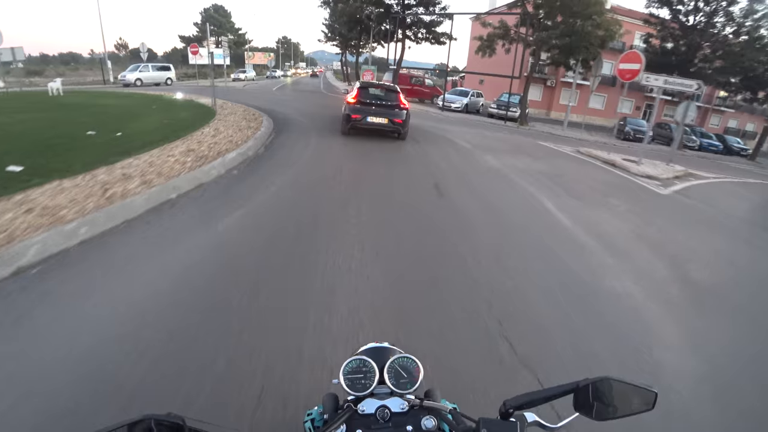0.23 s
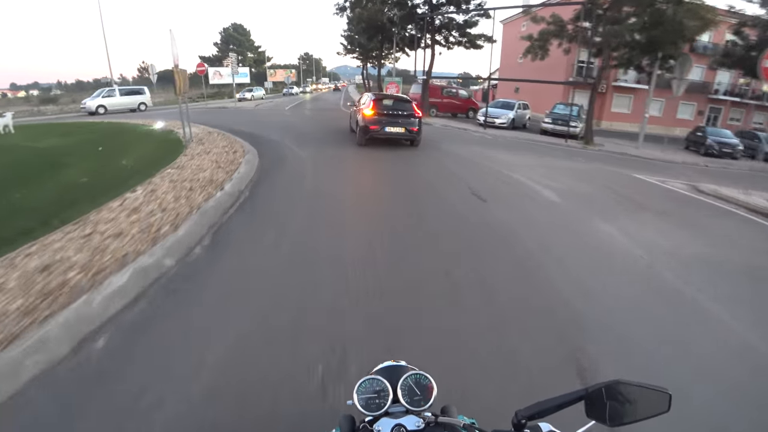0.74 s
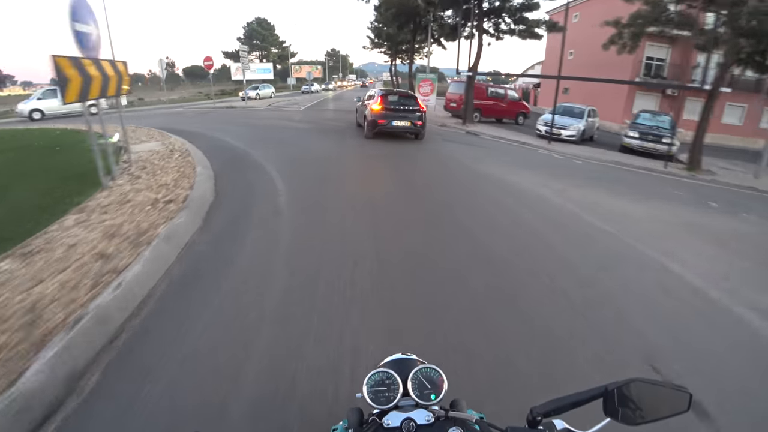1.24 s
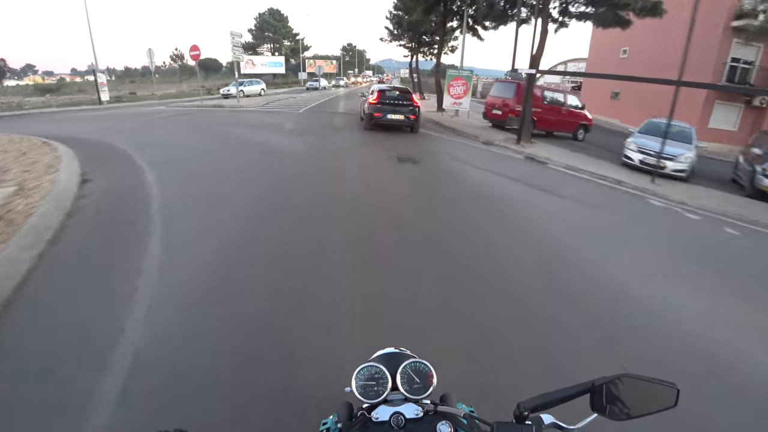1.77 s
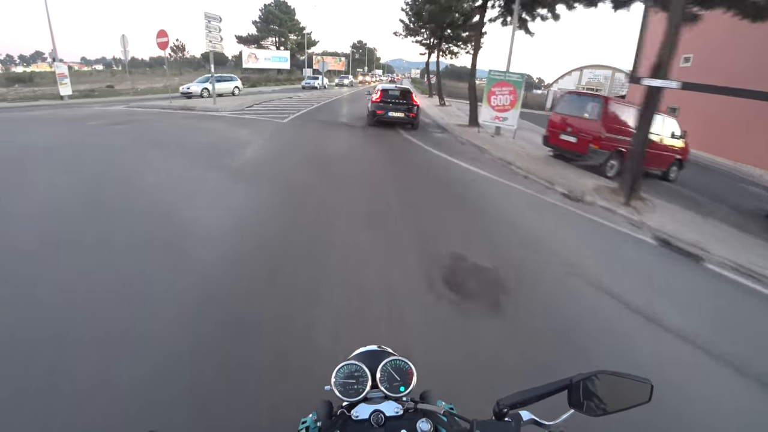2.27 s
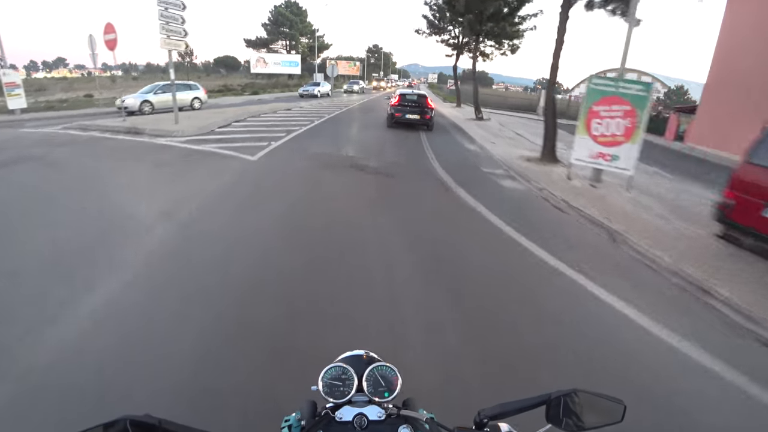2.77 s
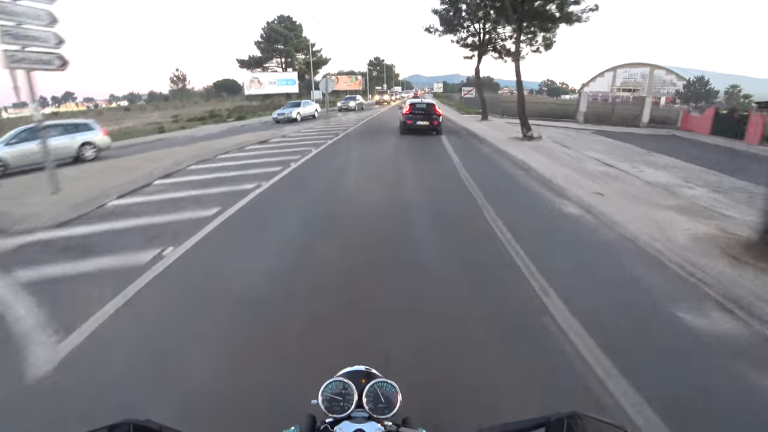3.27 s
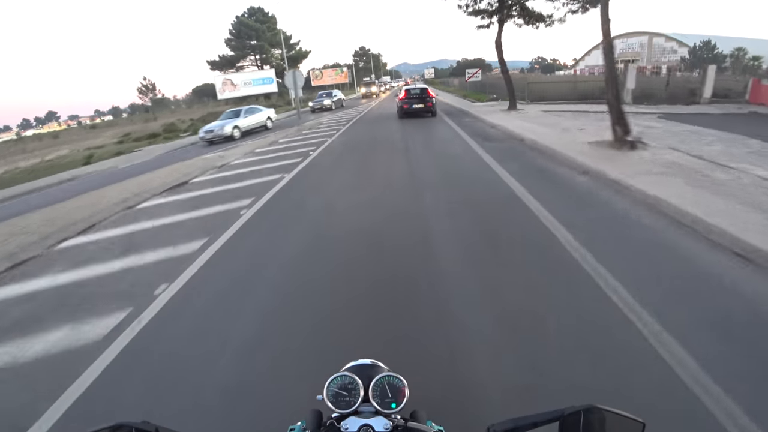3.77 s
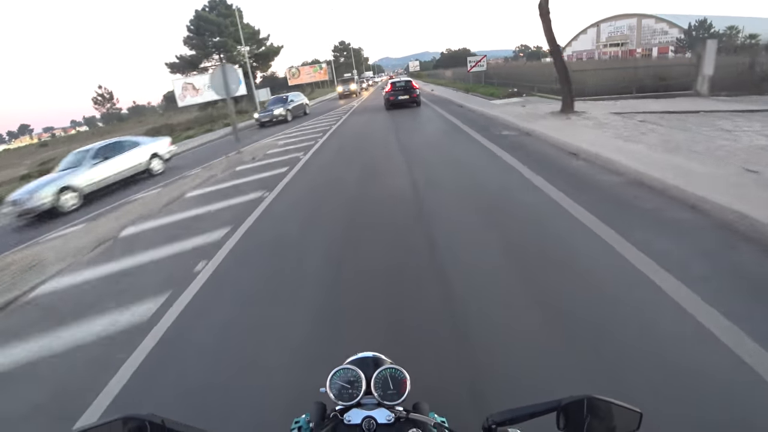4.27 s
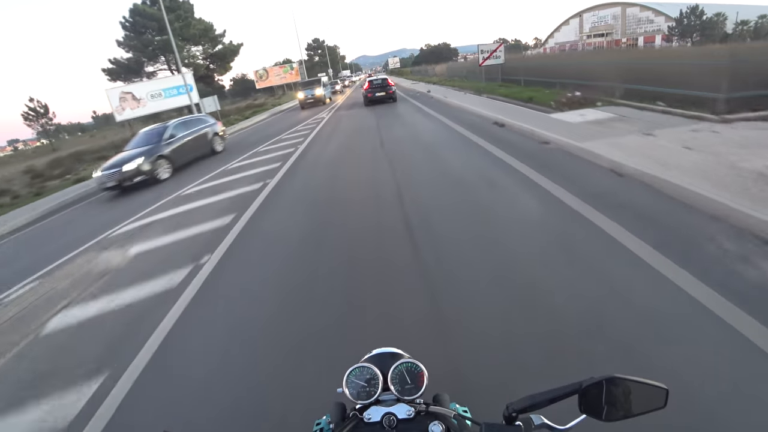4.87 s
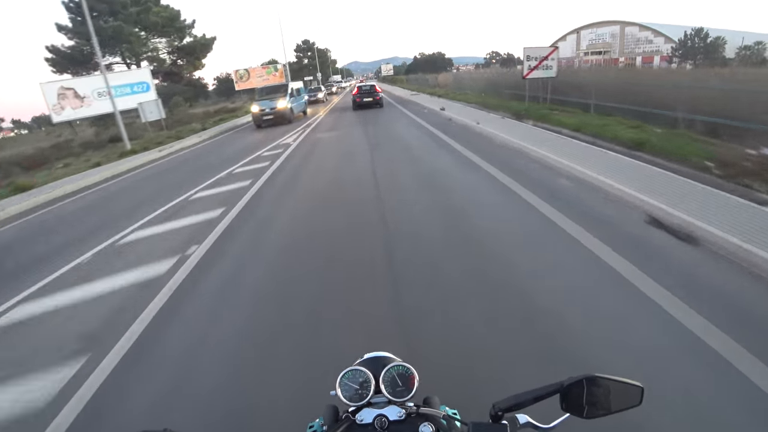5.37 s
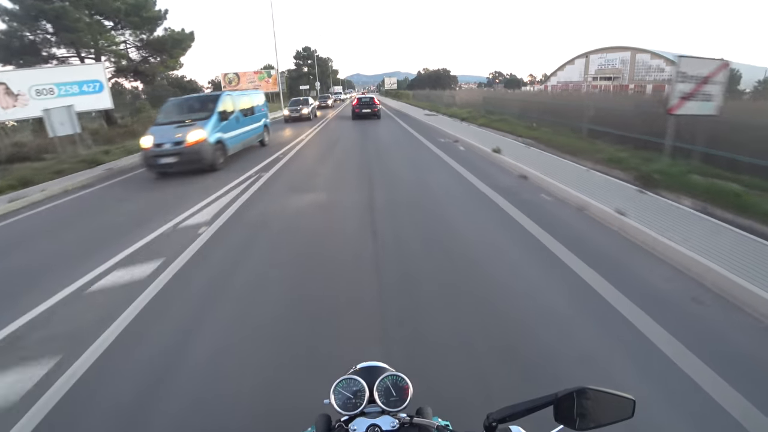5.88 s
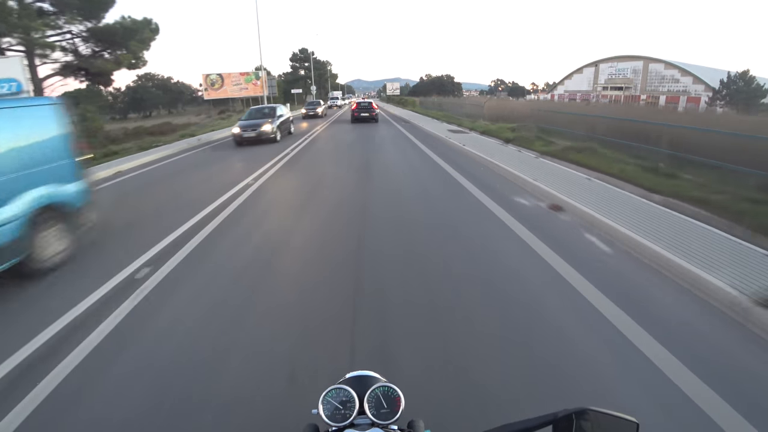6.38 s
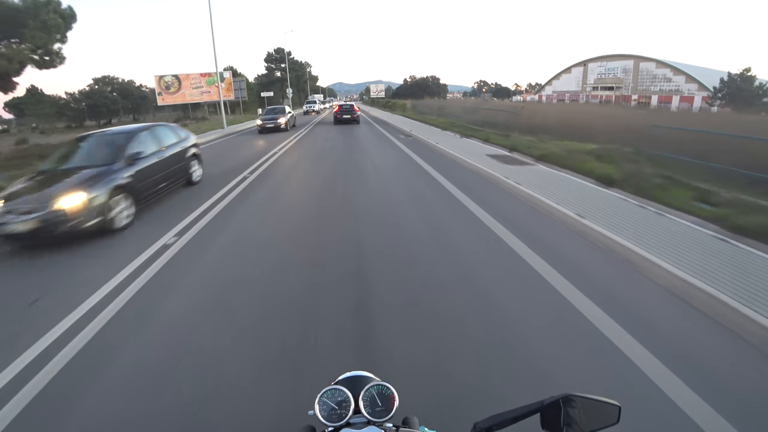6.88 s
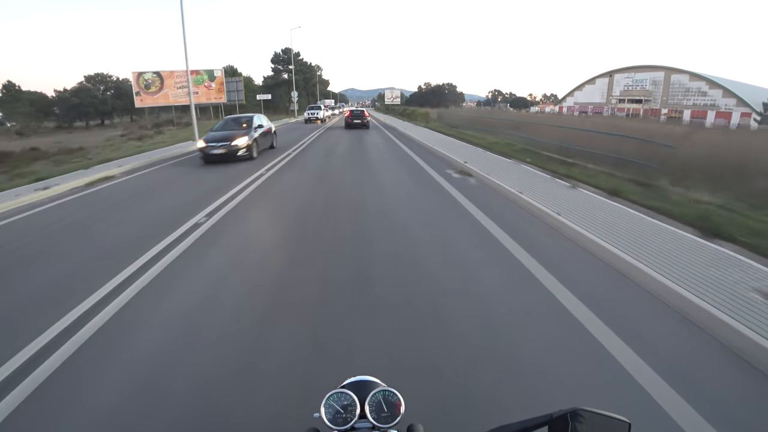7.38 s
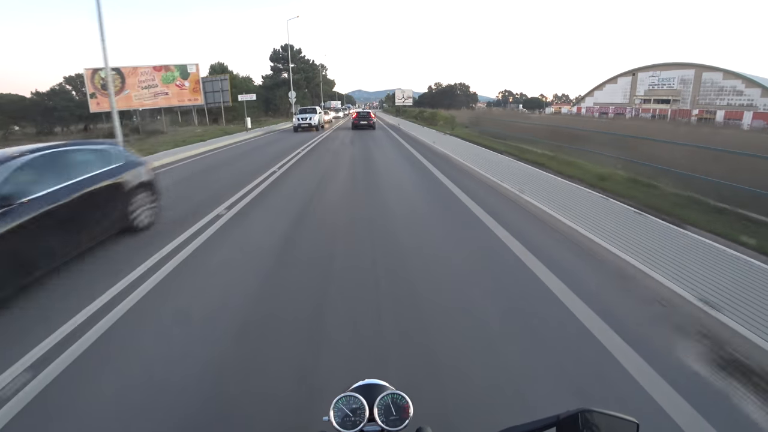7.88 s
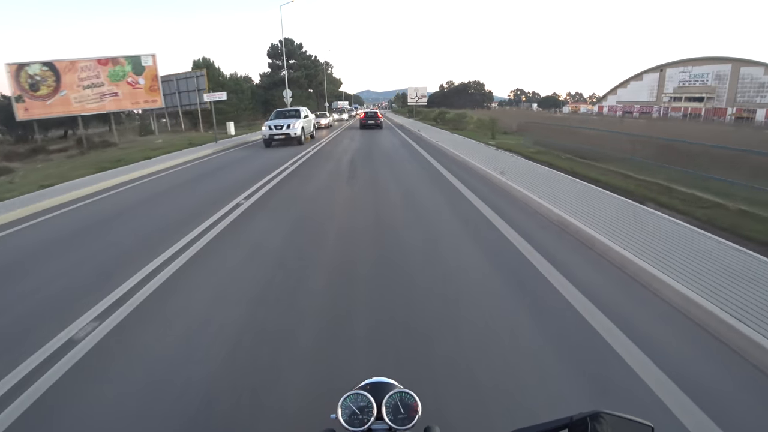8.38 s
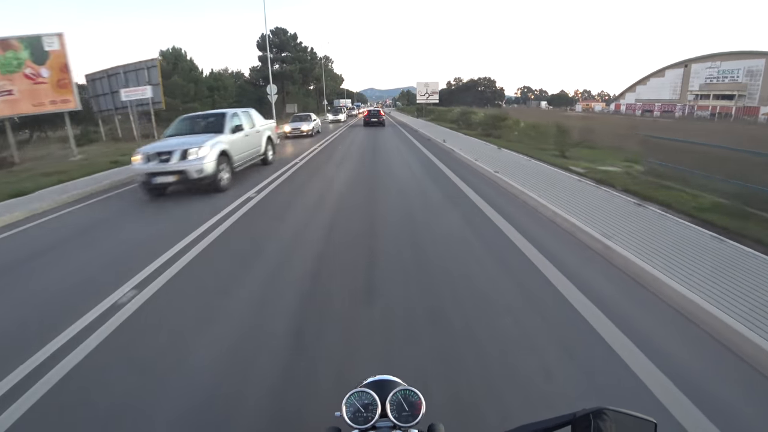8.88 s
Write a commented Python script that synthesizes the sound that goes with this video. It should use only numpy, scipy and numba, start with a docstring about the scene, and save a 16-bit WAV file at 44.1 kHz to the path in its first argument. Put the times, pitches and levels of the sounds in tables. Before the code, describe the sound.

A one-cylinder motorcycle growls up through the gears, its exhaust popping at the shifts, over rushing wind and tyres.

```python
"""On the road, in the rider's seat: a one-cylinder motorcycle leaves a bend and pulls through the gears.
Surges of gas in each engine cycle make the airbox (the air intake) and exhaust ring, a growl that climbs
with the revs. Gas rasps through the throttle, valves tick, chain and gears hiss and the crankshaft hums.
When the throttle shuts for a gear change, unburnt fuel pops in the exhaust and the gearbox clicks.
Wind and tyres rush underneath."""
import sys
import numpy as np
from scipy import signal
from scipy.fft import rfft, irfft, next_fast_len
from scipy.io import wavfile
from scipy.ndimage import uniform_filter1d
from numba import njit

SR = 44100
rng = np.random.default_rng(int(sys.argv[2]) if len(sys.argv) > 2 else 0)


def persist_wave(psi):
    """Save psi, clipped to +-1, as 16-bit WAV."""
    counts = np.round(np.clip(psi, -1, 1) * 32767).astype(np.int16)
    wavfile.write(sys.argv[1], SR, np.atleast_2d(counts).T)


N = 402191
T = np.arange(N) / SR
SIZE = next_fast_len(N + SR // 4, True)
FREQ = np.maximum(np.fft.rfftfreq(SIZE, 1 / SR), 1)
MID_REVS_HZ, MID_KMH = 46, 50  # middling firing rate and road speed: here revs = 1 and pace = 1
RAGGED_BELOW = 0.056  # throttle opening (0-1) below which the firing turns ragged
SIDES = np.array([[.5], [-.5]])  # shares a difference between left and right

# Ringing tones of airbox and exhaust at middling revs:
# pitch_hz, width_hz, level_db, left_over_right_db, left_lead_rad, climb (octaves per doubling of revs)
PIPE_TONES = [(287.94, 20.93, -8.18, -1.44, -0.28, 0.04), (310.24, 38.17, -7.29, -2.02, -0.99, 0.04),
              (344.84, 33.63, -11.99, -6.4, -0.11, 0.19), (438.49, 46.17, -15.83, 4.67, 1.19, -0.09),
              (517.22, 65.31, -17.33, 11.0, -2.18, -0.02), (665.51, 89.69, -15.01, -2.31, 2.62, -0.01),
              (776.92, 28.36, -7.5, 6.7, -1.23, 0.05), (874.47, 42.3, 0.24, 6.99, 2.02, 0.21),
              (915.22, 120.36, -5.33, 7.02, 2.12, 0.37), (1122.59, 31.09, -15.17, 6.27, -6.25, 0.13),
              (1277.68, 61.28, -1.9, 3.35, 3.11, 0.17), (1416.22, 101.43, -18.39, -3.24, 2.25, 0.11),
              (1611.34, 79.26, -9.89, -3.18, 2.16, 0.17), (1807.93, 116.64, -14.14, -3.3, 1.87, 0.1)]
# How far the engine's sound on the left runs ahead of the right: pitch_hz, left_lead_rad
LEFT_LEAD = [(60, 0.3), (200, 1.6), (300, 0.9), (440, 1.6), (560, 3.8), (740, 1.4), (870, 2.8), (1000, 2.3),
             (1400, 3.0), (1850, 2.0), (2200, 2.9), (2700, -0.2), (4000, 2.2), (5600, 1.6), (8000, 0.3),
             (11000, -0.4)]


def undb(db):
    """Turn decibels into a gain."""
    return 10 ** (np.asarray(db) / 20)


def unit(x):
    """Scale to an average (rms) level of 1."""
    return x / np.sqrt(np.mean(x ** 2))


def curve(points):
    """Join (time_s, value) points into a value for every sample."""
    return np.interp(T, *np.transpose(points))


def across(points):
    """Join (pitch_hz, value) points into a value for every frequency."""
    hz, value = np.transpose(points)
    return np.interp(np.log(FREQ), np.log(hz), value)


def shape(x, response):
    """Filter a sound with a gain for every frequency."""
    return irfft(rfft(x, SIZE) * response, SIZE)[..., :N]


def causal(gain):
    """A filter with this gain that rings only after it is struck."""
    cepstrum = irfft(np.log(gain), SIZE)
    cepstrum[1:SIZE // 2] *= 2
    cepstrum[SIZE // 2 + 1:] = 0
    return np.exp(rfft(cepstrum))


def walk(rate_hz):
    """A smooth random wander, roughly between -1 and 1."""
    knots = rng.standard_normal(2048)
    return uniform_filter1d(np.interp(T * rate_hz, np.arange(len(knots)), knots), int(SR / rate_hz / 2))


def ramp(start_s, length_s):
    """Rise from 0 to 1 in a straight line."""
    return np.clip((T - start_s) / length_s, 0, 1)


def burst(cycles, place, length):
    """Swell and die away once a cycle; place and length are fractions of the cycle."""
    age = (cycles - place) % 1 / length
    return age * np.exp(1 - age)


def add(out, start_s, peak_db, sound):
    """Place a short sound at its time and peak level."""
    start = int(start_s * SR)
    part = sound[:, :N - start]
    out[:, start:start + part.shape[1]] += undb(peak_db) * part / np.abs(part).max()


@njit
def resonate(x, hz, width_hz):
    """One ringing tone whose pitch can move; complex, with gain 1 at that pitch."""
    out, z, keep = np.empty_like(x), 0j, np.exp(-np.pi * width_hz / SR)
    for i in range(len(x)):
        z = z * keep * np.exp(2j * np.pi * hz[i] / SR) + (1 - keep) * x[i]
        out[i] = z
    return out


def out_of_step():
    """A filter for engine sound reaching left and right out of step."""
    return np.exp(1j * across(LEFT_LEAD) * SIDES)


def effort(law, opening, speed):
    """Gain from a level at full throttle and middling speed, a loss when shut and a change with speed."""
    full_db, shut_loss_db, doubling_db = law
    return undb(full_db - shut_loss_db * (1 - opening) + doubling_db * np.log2(speed))


def throttle_opening(crack=0.063, crack_s=0.036, shut_s=0.055):
    """In each gear the rider opens the throttle a crack, rolls it on, holds it and snaps it shut."""
    # One pull per gear: open_s, roll_on_s, close_s, full_opening (0-1)
    pulls = [(-.3, 0.41, 0.5, 0.82), (.905, 1, 4.24, 1), (4.71, 0.32, 7.87, 1), (8.29, 0.37, 9.4, 0.81)]
    opening = 0
    for open_s, roll_on_s, close_s, full in pulls:
        rise = crack * ramp(open_s, crack_s) + (1 - crack) * ramp(open_s, roll_on_s)
        opening += full * rise * (1 - ramp(close_s, shut_s))
    return opening


def hiss(level_db=-72, apart=0.89):
    """A steady, even hiss under everything."""
    return undb(level_db) * (rng.standard_normal(N) + apart * rng.standard_normal((2, N)))


def wind_and_tyres(pace, level_db=-47.5, doubling_db=8, buffet_doubling_db=6, flutter_db=1.5, pass_s=.16):
    """Wind and tyres flutter with the air and grow with road speed, the low buffeting fastest."""
    # Tone colour of the rush: pitch_hz, level_db
    rush_colour = [(20, -35), (48, -5), (68, -22), (97, 3.5), (130, -9), (190, -4), (280, 9), (600, 3.5),
                   (900, 12.5), (1350, 3.5), (1700, 8), (2100, -2), (2700, -3.5), (3800, -11),
                   (16000, -34.5)]
    # Oncoming vehicles swell the rush: time_s, swell_db
    oncoming = [(6.048, 2), (7.681, 3.5)]
    colour = undb(across(rush_colour))
    apart = 0.5 + 0.82 * FREQ / (FREQ + 500)  # left and right are most alike in the bass
    middle = shape(rng.standard_normal(N) * undb(flutter_db * walk(14)), colour)
    side = shape(rng.standard_normal(N) * undb(flutter_db * walk(14)), colour * apart)
    rush = (middle + 2 * SIDES * side) / middle.std()
    buffet = shape(rush, 1 / (1 + (FREQ / 130) ** 4))
    rush = rush - buffet + buffet * undb(buffet_doubling_db * np.log2(pace))
    traffic_db = sum(db / (1 + ((T - time_s) / pass_s) ** 2) for time_s, db in oncoming)
    return rush * undb(level_db + doubling_db * np.log2(pace) + traffic_db)


def crank_hum(cycles, revs, coasting, waver_db=1.5):
    """The crankshaft shakes the frame with a low hum that stands out on a shut throttle."""
    # Tones of the hum: multiple of the firing rate, level_db, shut_gain_db, doubling_db (of revs)
    hum_tones = [(2, -72, -7, 29), (3, -77, 9, -13), (4, -79, 9, -18)]
    hum = 0
    for multiple, db, shut_gain_db, doubling_db in hum_tones:
        level_db = db + shut_gain_db * coasting + doubling_db * np.log2(revs) + waver_db * walk(12)
        hum += np.sin(2 * np.pi * multiple * cycles) * undb(level_db)
    return hum


def valve_ticks(cycles, metal, pitch_hz=5900, width_hz=1700, scatter_db=2.5, fade_s=4.7):
    """The valves tick once a cycle, in spells; in each the tick softens and may drift in the cycle."""
    # Spells of ticking: start_s, end_s, first_place and last_place in the cycle (0-1), hardness (0-1)
    spells = [(3.635, 4.244, 0.21, 0.21, 0.8), (4.75, 7.94, 0.16, 0, 0.94), (8.38, 9.2, 0.9, 0.92, 0.5)]
    gate, strength = np.zeros(N), undb(scatter_db * rng.standard_normal(512))
    for start_s, end_s, first, last, hardness in spells:
        place = first + (last - first) * ramp(start_s, end_s - start_s)
        spell = (T > start_s) * (T < end_s) * hardness * np.exp(-np.abs(T - start_s) / fade_s)
        gate += spell * strength[(cycles - place).astype(int)] * burst(cycles, place, length=0.037)
    colour = metal * out_of_step() / (1 + (2 * (FREQ - pitch_hz) / width_hz) ** 2)
    return shape(gate * rng.standard_normal(N), colour)


def chain_and_gears(cycles, throttle, pace, metal, tick_db=-7.5, spread_db=-8, waver_db=1.17):
    """Chain and gears hiss in time with the crank, valve ticks on top; all grow with load and speed."""
    # Loudness of the moving metal: full_db, shut_loss_db, doubling_db (of road speed)
    loudness = (-53.5, 6.4, 8.4)
    ticks = valve_ticks(cycles, metal)
    pulsing = 1 + 0.77 * burst(cycles, place=0.714, length=0.075)
    direct = shape(rng.standard_normal(N) * pulsing, metal * out_of_step())
    spread = shape(rng.standard_normal((2, N)), metal)
    sound = unit(direct) + undb(tick_db) * unit(ticks) + undb(spread_db) * unit(spread)
    waver = undb(waver_db * walk(17) - 1.6 * SIDES)  # a little louder on the right
    return sound / sound.mean(0).std() * effort(loudness, throttle, pace) * waver


def gear_clicks(metal, decay_s=0.0057, top_hz=5800):
    """The teeth that lock a gear in place click home."""
    # Gearbox clicks: start_s, peak_db
    clicks = [(4.446, -31), (4.463, -31), (4.554, -37), (8.155, -42)]
    out, size = np.zeros((2, N)), SR // 8
    steel_ring = irfft(metal / (1 + (FREQ / top_hz) ** 4), SIZE)[None, :size]
    for start_s, peak_db in clicks:
        strike = rng.standard_normal((2, size)) * np.exp(-T[:size] / decay_s)
        add(out, start_s, peak_db, signal.fftconvolve(strike, steel_ring))
    return out


def reach(index, db, left_db, lead):
    """How one pipe tone reaches left and right; neighbouring tones swing opposite ways."""
    return (-1) ** index * undb(db + SIDES * left_db) * np.exp(1j * SIDES * lead)


def outlet(low_cut_hz=260, high_cut_hz=2900):
    """The pipe openings let out little bass and little treble."""
    return (1j * FREQ / (1j * FREQ + low_cut_hz)) ** 2 / (1 + (FREQ / high_cut_hz) ** 4)


def pipe_filter():
    """Airbox and exhaust as a filter, at middling revs."""
    return outlet() * sum(reach(k, db, left_db, lead) / (1 + 2j * (FREQ - hz) / width_hz)
                          for k, (hz, width_hz, db, left_db, lead, _) in enumerate(PIPE_TONES))


def exhaust_pops(knock_cycles=3.4, overtone_cycles=2.5, snap_s=0.0023, rumble_s=0.0077):
    """Unburnt fuel pops in the exhaust: a pitched knock, a broad snap and a short rumble."""
    # Pops on a shut throttle: start_s, peak_db, pitch_hz
    pops = [(4.331, -30, 299), (4.329, -23, 837), (4.446, -12, 887), (4.446, -32, 305), (4.463, -20, 932),
            (4.552, -28, 870), (4.638, -17, 808), (4.639, -36, 305), (8.035, -35.5, 318), (8.143, -22, 785),
            (8.153, -33, 940)]
    out, size = np.zeros((2, N)), SR // 8
    age = T[:size]
    pipe_ring = irfft(pipe_filter(), SIZE)[:, :size]
    snap_band = signal.butter(4, [625, 2500], "bandpass", fs=SR, output="sos")

    def hump(peak_s):
        """Swell to 1 at peak_s, then die away."""
        return (age / peak_s) ** 2 * np.exp(1 - (age / peak_s) ** 2)

    for start_s, peak_db, hz in pops:
        lead = 0.75 * np.interp(hz, *np.transpose(LEFT_LEAD)) * SIDES
        phase = 2 * np.pi * hz * age
        knock = hump(knock_cycles / hz) * np.sin(phase + lead)
        overtone = hump(overtone_cycles / hz) * np.sin(1.8 * phase + lead)
        snap = unit(signal.sosfilt(snap_band, rng.standard_normal((2, size)))) * hump(snap_s)
        puff = rng.standard_normal((1, size)) * np.exp(-age / rumble_s)
        rumble = unit(signal.fftconvolve(puff, pipe_ring)[:, :size])
        add(out, start_s, peak_db, knock + 0.54 * overtone + 0.14 * snap + 0.096 * rumble)
    return out


def throttle_rasp(cycles, revs, throttle, pitch_hz=1030, width_hz=300):
    """Gas tears through the open throttle once a cycle, growing fast with the revs."""
    # Loudness of the rasp: full_db, shut_loss_db, doubling_db (of revs)
    loudness = (-54, 28, 38)
    # Moments when the rasp flares: time_s, half_length_s, gain_db
    flares = [(3.02, .12, 11.5), (4.05, .2, 2), (7.3, .1, 4)]
    puffs = rng.standard_normal(N) * burst(cycles, place=.55, length=.2)
    rasp = shape(puffs, out_of_step() / (1 + 2j * (FREQ - pitch_hz) / width_hz) ** 2)
    flare_db = sum(db * np.exp(-((T - time_s) / half_s) ** 2) for time_s, half_s, db in flares)
    return unit(rasp) * effort(loudness, throttle, revs) * undb(flare_db)


def gas_surges(cycles, firing_hz, coasting, jitter_s=.00001, coast_jitter_s=.00007,
               scatter_db=0.75, coast_scatter_db=2.6, rasp_db=-19):
    """Each cycle brings sharp surges and a rasp of gas; firing turns ragged when the throttle shuts."""
    # Surges in one cycle: place (0-1) at middling revs, push (+ or -), width_s, delay_cycles_per_hz
    surges = [(.404, -2.38, .00022, -.00197), (.594, -2.55, .00022, -.00044), (.601, -1.29, .00017, .00077),
              (.702, .68, .00003, .00127), (.799, .37, .00004, .00193)]
    timing_luck, strength_luck = rng.standard_normal((512, 2))[cycles.astype(int)].T
    early_s = timing_luck * (jitter_s + coast_jitter_s * coasting)
    strength = undb(strength_luck * (scatter_db + coast_scatter_db * coasting))
    thuds = 0
    for place, push, width_s, delay in surges:
        since_s = (cycles % 1 - place - delay * (firing_hz - MID_REVS_HZ)) / firing_hz + early_s
        thuds += push / width_s * np.exp(-.5 * (since_s / width_s) ** 2)
    puffs = rng.standard_normal(N) * (burst(cycles, place=.45, length=.2) + 0.31)
    rasp = shape(puffs, FREQ / (FREQ + 800) / np.hypot(1, FREQ / 2500))
    return unit(thuds * strength) + unit(rasp) * undb(rasp_db)


def ring_pipes(gas, revs):
    """Airbox and exhaust ring with the gas; most of their tones climb with the revs."""
    wave = signal.hilbert(gas, SIZE)[:N]
    return sum((reach(k, db, left_db, lead) * resonate(wave, hz * revs ** climb, float(width_hz))).real
               for k, (hz, width_hz, db, left_db, lead, climb) in enumerate(PIPE_TONES))


def exhaust_growl(gas, revs, throttle, waver_db=1.1):
    """The note of the ringing pipes: its low boom needs little throttle, its higher bark needs a lot."""
    # Bands of the note, from airbox boom up to rasp:
    # top_hz, throttle_exponent, full_db, shut_loss_db, doubling_db (of revs)
    bands = [(399, 0.37, -42.5, 9.5, 10), (580, 0.21, -47, 22, -2), (801, 0.81, -43.3, 12, 19),
             (1003, 0.9, -41.3, 17.5, 5), (2630, 1, -40.3, 16.5, 6)]
    # Moments when the band holding a pitch swells or sinks: time_s, half_length_s, pitch_hz, gain_db
    swells = [(3.54, 0.13, 300, 3.5), (4.83, .13, 300, 4), (5.26, .4, 300, -2), (1.5, 0.5, 300, 3),
              (2.27, 0.16, 300, -2), (.72, .15, 300, -3), (4.55, .15, 300, 2), (6.7, .5, 300, 1.5),
              (1.1, .2, 450, 4), (2.1, .5, 450, 2), (4.1, .25, 450, -2), (6.7, 0.48, 750, 3),
              (2.81, 0.074, 950, 3), (3, 0.091, 950, 4), (5.6, .6, 950, 1.5), (.3, .4, 950, -2.5),
              (3.03, 0.17, 1500, 4), (3.45, .1, 1500, 2), (3.88, 0.2, 1500, -1), (6.7, 0.5, 1500, 1)]
    spectrum = rfft(ring_pipes(gas, revs), SIZE) * outlet()
    out, below_bottom, bottom_hz = 0, 0, 0
    for top_hz, exponent, *loudness in bands:
        below_top = 1 / (1 + (FREQ / top_hz) ** 8)
        band = irfft(spectrum * (below_top - below_bottom), SIZE)[:, :N]
        swell_db = sum(db * np.exp(-((T - time_s) / half_s) ** 2)
                       for time_s, half_s, hz, db in swells if bottom_hz < hz <= top_hz)
        gain = effort(loudness, throttle ** exponent, revs) * undb(swell_db + waver_db * walk(12))
        out += band / band.std() * gain
        below_bottom, bottom_hz = below_top, top_hz
    return out


def scene():
    """One crankshaft times the running engine; throttle, revs and road speed set the levels."""
    # Engine speed: time_s, firing_hz (firings per second)
    engine_speed = [(0.0, 45.2), (0.399, 49.56), (0.525, 50.28), (0.792, 44.22), (1.037, 34.72),
                    (1.424, 36.45), (2.321, 43.18), (3.473, 51.1), (4.248, 54.67), (4.471, 47.57),
                    (4.786, 42.15), (4.911, 41.48), (5.488, 43.68), (7.062, 48.68), (7.838, 50.64),
                    (7.998, 48.3), (8.364, 39.05), (9.12, 39.71)]
    # Speed along the road: time_s, speed_kmh
    road_speed = [(0, 42), (.5, 40), (1.05, 31.3), (4.25, 57.4), (4.9, 42.8), (7.85, 64.5), (9.12, 59.5)]
    # Tone colour of chain, gears and valves: pitch_hz, level_db
    metal_colour = [(1500, -33), (2500, 4.5), (3700, -16.5), (4300, -7), (4780, 3), (5150, 1.5),
                    (5500, 4.5), (6350, -3), (6800, -8), (7250, -6), (8000, -12), (9000, -16), (10300, -14),
                    (11700, -18.5), (12400, -23), (16000, -30)]
    firing_hz, throttle = curve(engine_speed), throttle_opening()
    revs, pace = firing_hz / MID_REVS_HZ, curve(road_speed) / MID_KMH
    cycles = np.cumsum(firing_hz) / SR  # engine cycles so far
    coasting = np.exp(-throttle / RAGGED_BELOW)  # 1 with the throttle shut, near 0 when open
    metal = causal(undb(across(metal_colour)))
    gas = gas_surges(cycles, firing_hz, coasting)
    engine = exhaust_growl(gas, revs, throttle) + throttle_rasp(cycles, revs, throttle)
    machinery = chain_and_gears(cycles, throttle, pace, metal) + crank_hum(cycles, revs, coasting)
    return engine + machinery + exhaust_pops() + gear_clicks(metal) + wind_and_tyres(pace) + hiss()


def record(dry):
    """Cut away the highest treble, above 15800 Hz."""
    return signal.sosfilt(signal.ellip(10, .2, 70, 15800, fs=SR, output="sos"), dry)


dry = scene()
out = record(dry)
persist_wave(out)
```